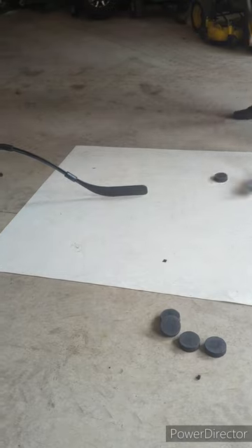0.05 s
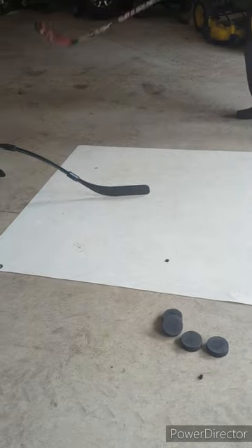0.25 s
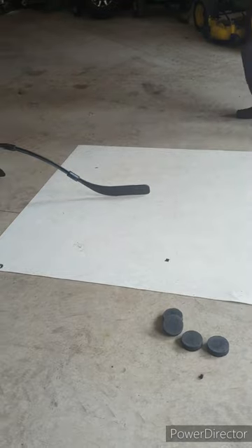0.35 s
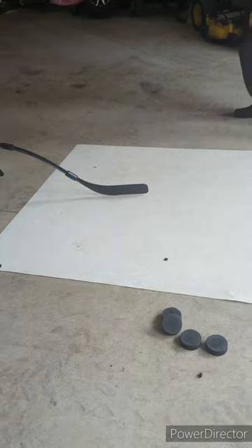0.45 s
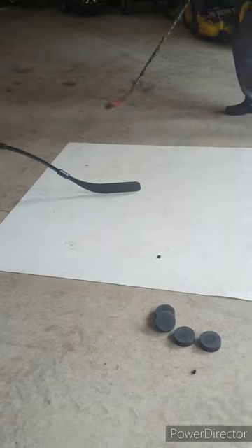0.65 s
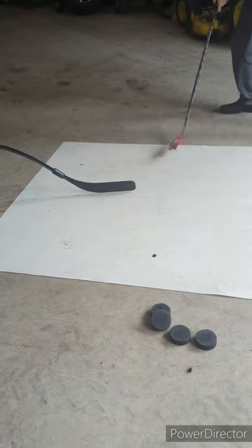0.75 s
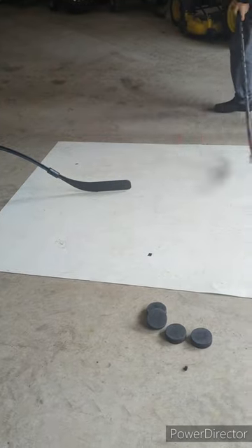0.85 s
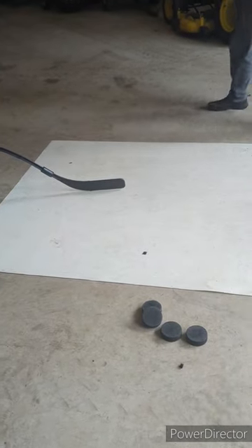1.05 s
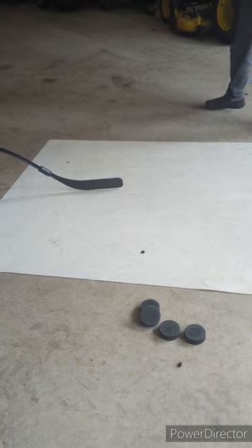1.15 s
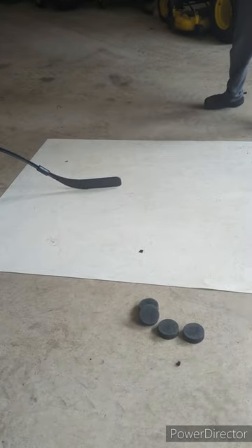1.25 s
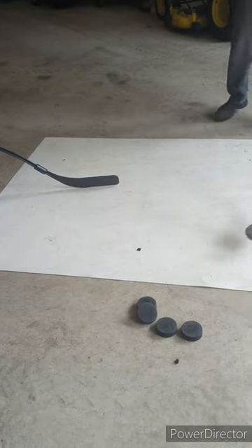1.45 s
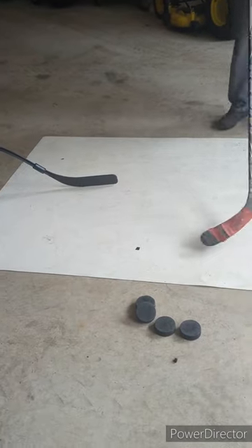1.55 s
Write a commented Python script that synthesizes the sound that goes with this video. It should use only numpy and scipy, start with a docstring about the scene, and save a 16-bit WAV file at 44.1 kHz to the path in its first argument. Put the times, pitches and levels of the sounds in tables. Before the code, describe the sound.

A hockey stick shot cracks against a puck, then a deep thud booms in a garage

```python
"""First a hockey blade sweeps a puck over a plastic sheet in a bare concrete garage, chattering against it.
The blade slaps the sheet and cracks against the puck, which thuds into a backstop that booms on.
The stick then clatters down on the floor and taps again.
Scrapes and echoes are shaped noise; blade, backstop and lingering tones are fading sine waves.
Shot, thud and taps start as clicks, which are also sent through a long, bright garage echo."""
import sys
import numpy as np
from scipy import signal
from scipy.io import wavfile
from scipy.ndimage import uniform_filter1d, minimum_filter1d

SR = 44100
rng = np.random.default_rng(int(sys.argv[2]) if len(sys.argv) > 2 else 0)


def to_wav(s):
    """Save 16-bit WAV."""
    ch = np.atleast_2d(s).T  # columns
    pcm = np.round(np.clip(ch, -1, 1) * 32767)  # PCM
    wavfile.write(sys.argv[1], SR, pcm.astype(np.int16))


N = 70560
TIME = np.arange(N) / SR  # seconds

# Levels in the tables are relative: each sound sets its own loudness later.
# A t60 is the time to fade by 60 dB; a lower cutoff_hz means a softer, duller contact.

# How long each pitch echoes, before each sound adjusts its treble: pitch_hz, t60_s
GARAGE_T60 = [(60, 0.92), (160, 0.69), (400, 1.11), (1000, 1.17), (2200, 1), (4500, 0.95), (8000, 0.74),
              (14000, 0.49)]
# How alike left and right are (1 same, 0 unrelated, -1 opposite): pitch_hz, likeness (no unit)
LIKENESS = [(60, 0.97), (160, 1), (300, 0.9), (520, 0.31), (800, 0.14), (1300, -0.33), (2200, .08),
            (5000, -0.022), (12000, 0.17)]
# Colour of the room tone: pitch_hz, level_db (per Hz)
ROOM_TONE_COLOUR = [(25, -30), (60, -17.5), (120, -5), (200, -25), (600, -8), (2000, -49), (15000, -46)]
# Colour of the blade scuffing the floor: pitch_hz, level_db (per Hz)
SCUFF_COLOUR = [(300, -19), (1000, -4), (1700, 12), (2550, -10), (3600, -7), (6500, -22.5), (15000, -29)]
# The blade bearing down on the sheet: start_s, level_db, cutoff_hz
BUMPS = [(0.2325, -11, 600), (0.272, 4.5, 500)]
# Thin, bright snaps of the taped blade: start_s, level_db, cutoff_hz
SNAPS = [(0.2336, -6, 16000), (0.2404, 4, 16500), (1.3057, -27, 14000), (1.3126, -23, 13900)]
# Loudness of the sweep over time: time_s, level_db
SWEEP_LEVEL = [(0, -36.5), (.035, -34), (.058, -35), (.085, -38), (.108, -35.5), (.13, -37.5), (.19, -39.5),
               (.24, -40.5), (.4, -75)]
# Colour of the sweep: pitch_hz, level_db (per Hz)
SWEEP_COLOUR = [(100, -32), (500, -24.5), (1450, -5), (1900, 1.5), (2500, -2.5), (3300, -6.5), (4300, -10),
                (5600, -17.5), (9000, -22), (15000, -23)]
# The puck chattering against the blade: start_s, level_db
NUDGES = [(.0562, 0), (.0665, -5), (.078, -6), (.1065, -4)]
# Tones that ring at each of these light touches: pitch_hz, level_db, t60_s, build_s
NUDGE_RING = [(1860, 6, 0.038, .0005), (2060, -3, 0.027, .0005), (2440, 9, 0.023, 0.00044)]
# Ringing tones of the blade: pitch_hz, level_db, t60_s
BLADE_MODES = [(445, -19.5, 0.01), (880, -6, 0.033), (1340, -1, 0.048), (1890, -0.5, 0.019),
               (2490, -6, 0.02), (2870, -6, 0.015), (4440, -18, .005), (7200, -4.5, 0.0044)]
# The stick coming down on the floor: start_s, level_db, cutoff_hz, room_share_db
TAPS = [(1.2925, -0.5, 800, 9), (1.3055, 1, 6500, -6), (1.3122, 4.5, 9000, -16), (1.3262, -1, 9100, 8),
        (1.5822, 5, 2000, -6), (1.5975, -1, 2200, -11)]
# Colour of the taps in the room: pitch_hz, level_db (per Hz)
TAP_COLOUR = [(60, -34), (160, 5), (250, -7.5), (450, 2.5), (1000, -2), (1800, -1.5), (2600, -1.5),
              (3700, -16), (6000, -21.5), (9000, -21.5), (15000, -18)]
# The puck meets the backstop, which rattles and swings back: start_s, level_db, cutoff_hz
THUD = [(0.6454, 6.5, 12900), (0.6640, -10.5, 13900), (0.765, -2, 900)]
# Tones of the backstop and the room it shakes: pitch_hz, level_db, t60_s, build_s
BOOM = [(62.5, -32.5, 1.25, .01), (115, -44, 0.45, 0.003), (129.8, -16, 0.85, 0.004),
        (144.9, -30, 1.7, .06), (161.16, -9.5, 0.78, 0.004), (169, -8.5, 0.51, 0.051),
        (177.8, -13, 1.06, .015), (222.3, -14.5, 0.78, .008), (261.7, -26, 0.46, 0.018),
        (288.2, -7.5, 0.93, 0.13), (311.3, -2, 0.72, 0.13), (328.5, -9, 1.1, 0.13), (327, -10, 0.96, 0.096),
        (353.3, -27, 0.96, 0.078), (352, -9.5, 1.04, 0.07), (387.8, -12, 1.07, 0.18),
        (487.8, -19, 1.34, 0.033), (528, -16.5, 1.14, 0.11), (551.3, -11, 1.11, 0.15),
        (582.6, -14, 1.08, 0.084)]
# Colour of the thud in the room: pitch_hz, level_db (per Hz)
THUD_COLOUR = [(28, -33), (80, -17), (160, -4), (235, -5.5), (340, -0.5), (450, -2.5), (570, -9),
               (690, -11.5), (820, -7.5), (1300, -19), (2400, -19), (4000, -29), (8000, -35.5),
               (15000, -36.5)]
# The shot, blade on sheet and then on puck: start_s, level_db, cutoff_hz, room_share_db
SHOT = [(0.2334, 5, 3330, -10.5), (0.24, 3, 16200, 1)]
# Colour of the shot in the room: pitch_hz, level_db (per Hz)
SHOT_COLOUR = [(50, -24), (130, -23), (220, -9), (290, -14.5), (420, 5), (750, 0.5), (1100, 2), (1600, 5),
               (2050, 1), (2450, 2.5), (3200, -2), (4300, -4.5), (4900, -6.5), (6500, -11), (9000, -15.5),
               (15000, -23)]
# Tones that linger in the garage after the crack: pitch_hz, level_db, t60_s, build_s
SHOT_RINGS = [(485, -6, 0.69, 0.11), (949, -1.5, 0.93, 0.1), (1163, -1, 0.29, 0.051),
              (1400, -2, 0.83, 0.032), (1454, -10, .8, 0.11), (1564, 8, 0.29, 0.05),
              (1662, 6.5, 0.38, 0.067), (1824, 1, 0.32, 0.048), (1871, 4, 0.5, 0.057),
              (2424, -10.5, 1, 0.044), (2845, -4.5, 1, 0.11), (2910, -12, 0.85, 0.064),
              (3321, -26, 0.73, 0.09)]

LEFT_LEAD_S = 0.000457  # the left microphone hears nearby sounds this much earlier
ROOM_TONE_DB, NUDGE_DB = -55.5, -31
SCUFF_AT_S, SCUFF_S, SCUFF_DB = 1.33, 0.011, -30.5  # middle, half-length, level
BUMP_HZ, BUMP_S = 224, 0.0073  # pitch, time to reach its peak
SNAP_DB, SNAP_S, SNAP_LOW_HZ = -13.5, 0.0013, 8000  # level, fading time, lowest pitch let through
LIMIT_DB, RELEASE_DB_PER_S = -0.4, 600
TOP_HZ = 16800  # from here up, the final filter takes off at least 60 dB


def from_db(db):
    """Turn decibels into a plain multiplier."""
    return 10 ** (np.asarray(db) / 20)


def at_hz(points, hz):
    """Read a table between its rows, with pitch spaced evenly by octave."""
    table = np.array(points)
    return np.interp(np.log(hz), np.log(table[:, 0]), table[:, 1])


def bands(colour):
    """Third-octave bands of stereo noise as (centre Hz, band); together they have an rms of about 1."""
    edges = np.geomspace(22, 17500, 30)
    # two stereo noises take turns, so that neighbouring bands are unrelated
    white = rng.standard_normal((2, 2, N + 4000))
    coloured = []
    for k, (low, high) in enumerate(zip(edges, edges[1:])):
        band_filter = signal.butter(2, [low, high], "band", fs=SR, output="sos")
        # leave out the start, where the filter is still settling
        mid, side = signal.sosfilt(band_filter, white[k % 2])[:, -N:]
        hz = np.sqrt(low * high)
        alike = np.clip(at_hz(LIKENESS, hz), -0.999, 0.999)
        shared = np.sqrt(1 + alike) * mid
        opposed = np.sqrt(1 - alike) * side * [[1], [-1]]
        coloured.append((hz, from_db(at_hz(colour, hz)) * (shared + opposed)))
    rms = np.sqrt(sum(np.mean(band ** 2) for _, band in coloured))
    return [(hz, band / rms) for hz, band in coloured]


def noise(colour):
    """Steady stereo noise of one colour."""
    return sum(band for _, band in bands(colour))


def contacts(rows, sent=False):
    """One click per contact, duller where it is soft; sent adds the room share to its level."""
    clicks = np.zeros(N)
    for start_s, level_db, cutoff_hz, *room_db in rows:
        gain = from_db(level_db + sent * sum(room_db))
        click = gain * (np.arange(N) == int(start_s * SR)) + 1e-18  # tiny offset avoids slow arithmetic
        clicks += signal.sosfilt(signal.butter(2, cutoff_hz, fs=SR, output="sos"), click)
    return clicks


def convolve(x, response):
    """Start a copy of the response at every moment of the sound, as loud as the sound is then."""
    return signal.fftconvolve(np.atleast_2d(x), np.atleast_2d(response), axes=1)[:, :N]


def direct(x, pan_db):
    """Straight to the microphones: the left hears it first; positive pan_db makes the left louder."""
    left = x * from_db(pan_db / 2)
    right = np.interp(TIME - LEFT_LEAD_S, TIME, x, left=0) * from_db(-pan_db / 2)
    return np.array([left, right])


def garage(x, colour, first_db, build_s, treble_build_s, hold_s, treble_ring, lumpy_db):
    """Echoes begin first_db from full level, reach it, hold, then fade at each band's own rate."""
    lumps = uniform_filter1d(rng.standard_normal(N), size=70)
    lumps_db = lumpy_db * lumps / lumps.std() * np.exp(-TIME / 0.064)  # uneven early, smoother later
    response = 0
    for hz, band in bands(colour):
        build = at_hz([(2500, build_s), (10000, treble_build_s)], hz)
        t60 = at_hz(GARAGE_T60, hz) * at_hz([(2500, 0.99), (10000, treble_ring)], hz)
        swell_db = first_db * np.maximum(1 - TIME / build, 0)
        decay_db = -60 * np.maximum(TIME - build - hold_s, 0) / t60
        response = response + band * from_db(swell_db + decay_db + lumps_db)
    return convolve(x, response)


def ringing(modes, start_s):
    """Tones that build up and die away, reaching the two microphones out of step."""
    tones = 0
    age = np.maximum(TIME - start_s, 0)
    for hz, level_db, t60, build_s in modes:
        # the less alike left and right are, the further apart their waves
        half_angle = np.arccos(at_hz(LIKENESS, hz)) / 2
        apart = half_angle * np.array([[1], [-1]]) * rng.choice([-1, 1])
        level = from_db(level_db - 60 * age / t60) * (1 - np.exp(-age / build_s))
        tones = tones + level * np.sin(2 * np.pi * (hz * age + rng.random()) + apart)
    return tones


def blade(x, crack_db, crack_s):
    """Each contact sets off short blade tones and a fading crack of noise."""
    modes = 0
    for k, (hz, level_db, t60) in enumerate(BLADE_MODES):
        sign = (-1) ** k  # every other tone is upside down
        modes = modes + sign * from_db(level_db - 60 * TIME / t60) * np.sin(2 * np.pi * hz * TIME)
    crack = from_db(crack_db) * rng.standard_normal(N) * np.exp(-TIME / crack_s)
    return convolve(x, modes + crack)[0]


def room_tone():
    """Faint, steady noise under everything."""
    return from_db(ROOM_TONE_DB) * noise(ROOM_TONE_COLOUR)


def scuff():
    """A short rub of the blade on concrete: noise that swells and fades."""
    swell = np.exp(-((TIME - SCUFF_AT_S) / SCUFF_S) ** 2)
    return from_db(SCUFF_DB) * swell * noise(SCUFF_COLOUR)


def bump():
    """The loaded blade presses the sheet against the concrete: a low tone that rises and fades."""
    ring = np.sin(2 * np.pi * BUMP_HZ * TIME) * TIME / BUMP_S * np.exp(-TIME / BUMP_S)
    return from_db(-21.5) * direct(convolve(contacts(BUMPS), ring)[0], pan_db=1)


def snaps():
    """Thin snaps of the taped blade: brief bursts of noise with only the treble let through."""
    burst = rng.standard_normal(N) * np.exp(-TIME / SNAP_S)
    treble_filter = signal.butter(2, SNAP_LOW_HZ, "high", fs=SR, output="sos")
    bright = signal.sosfilt(treble_filter, burst)
    return from_db(SNAP_DB) * direct(convolve(contacts(SNAPS), bright)[0], pan_db=1)


def taps():
    """The blade lands, bounces and taps the floor again: blade tones plus the room's echo."""
    near = from_db(-29.5) * direct(blade(contacts(TAPS), crack_db=-8.5, crack_s=0.002), pan_db=-3.5)
    room = garage(contacts(TAPS, sent=True), TAP_COLOUR, first_db=0, build_s=0.011,
                  treble_build_s=0.006, hold_s=0.0036, treble_ring=0.91, lumpy_db=1.2)
    return near + from_db([[-35.5], [-34.3]]) * room  # left, right


def backstop():
    """A heavy blow: low tones build up and boom, over a broader, noisy wash of echoes from each contact."""
    wash = garage(contacts(THUD), THUD_COLOUR, first_db=0.5, build_s=0.086,
                  treble_build_s=0.0061, hold_s=0.022, treble_ring=1.22, lumpy_db=0.3)
    return from_db(1) * ringing(BOOM, THUD[0][0]) + from_db(-18.5) * wash


def sweep():
    """Blade and puck scrape unevenly across the sheet (noise) and chatter together (short tones)."""
    time_s, level_db = np.transpose(SWEEP_LEVEL)
    grip = uniform_filter1d(rng.standard_normal(N), size=300)
    uneven_db = 1.25 * grip / grip.std()
    level = from_db(np.interp(TIME, time_s, level_db) + uneven_db)
    scrape = level * noise(SWEEP_COLOUR) * (TIME < time_s[-1])
    chatter = sum(from_db(NUDGE_DB + db) * ringing(NUDGE_RING, start_s) for start_s, db in NUDGES)
    return scrape + chatter


def shot():
    """Slap and crack set off the blade's tones, then the room swells and rings."""
    near = from_db(-16) * direct(blade(contacts(SHOT), crack_db=2, crack_s=0.00041), pan_db=-1)
    room = garage(contacts(SHOT, sent=True), SHOT_COLOUR, first_db=-6, build_s=0.045,
                  treble_build_s=0.011, hold_s=0.075, treble_ring=1.0, lumpy_db=0.0)
    lingering = ringing(SHOT_RINGS, SHOT[1][0])
    return near + from_db(-15.5) * room + from_db(-14.5) * lingering


def scene():
    """Add all the sounds over the faint room tone."""
    return room_tone() + scuff() + bump() + snaps() + taps() + backstop() + sweep() + shot()


def record(dry):
    """A quick limiter turns both sides down together at peaks; then the highest treble is cut."""
    peak_db = 20 * np.log10(np.abs(dry).max(axis=0) + 1e-9)
    over_db = np.maximum(peak_db - LIMIT_DB, 0)
    # after a peak, the level comes back at a steady rate
    released_db = RELEASE_DB_PER_S * TIME
    held_db = np.maximum.accumulate(over_db + released_db) - released_db
    # act slightly ahead of each peak, and smoothly
    gain_db = uniform_filter1d(minimum_filter1d(-held_db, size=60), size=60)
    top_filter = signal.cheby2(12, 60, TOP_HZ, fs=SR, output="sos")
    return signal.sosfilt(top_filter, dry * from_db(gain_db))


dry = scene()
out = record(dry)
to_wav(out)
```